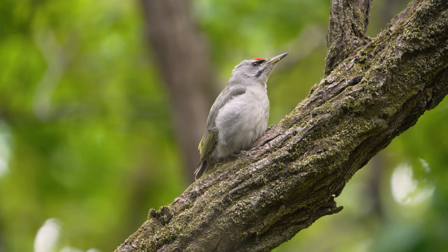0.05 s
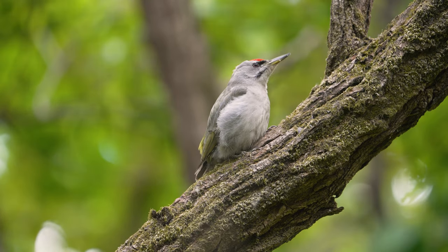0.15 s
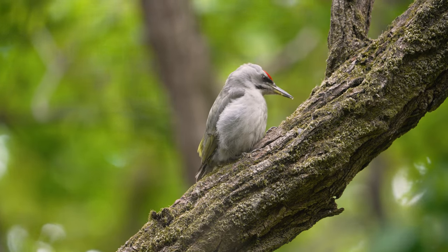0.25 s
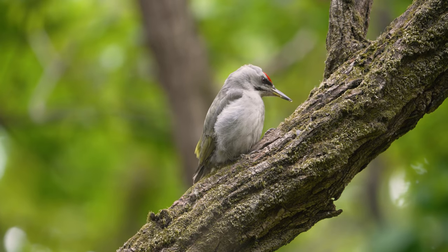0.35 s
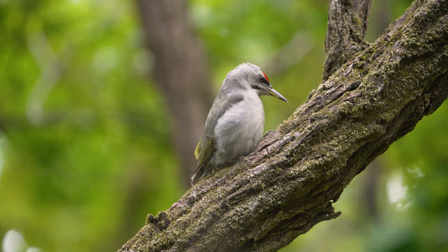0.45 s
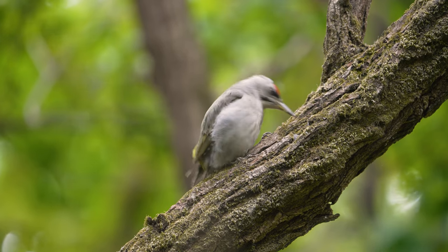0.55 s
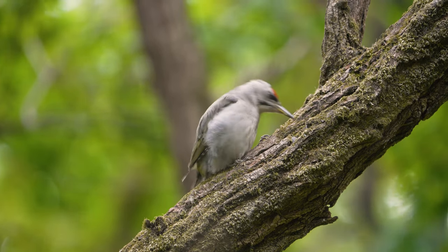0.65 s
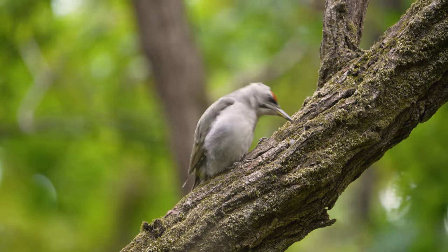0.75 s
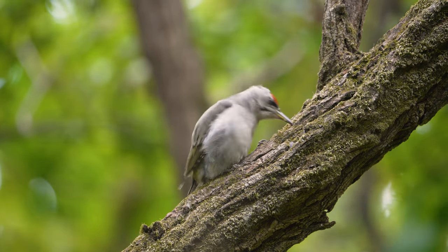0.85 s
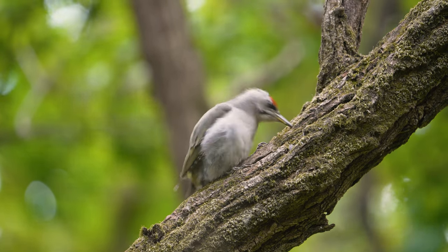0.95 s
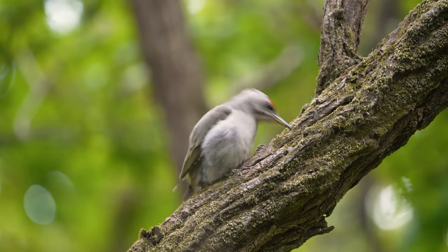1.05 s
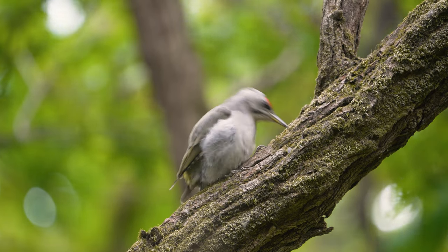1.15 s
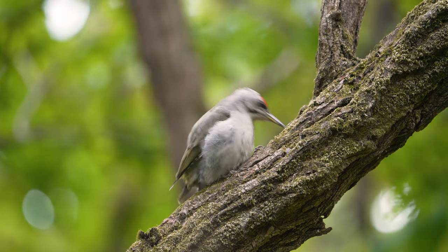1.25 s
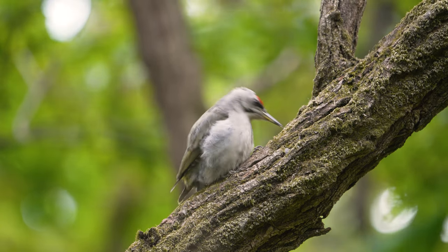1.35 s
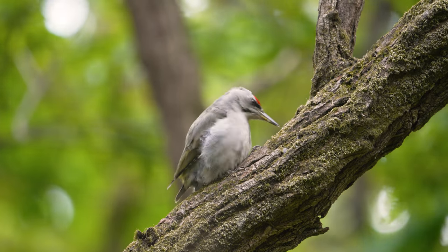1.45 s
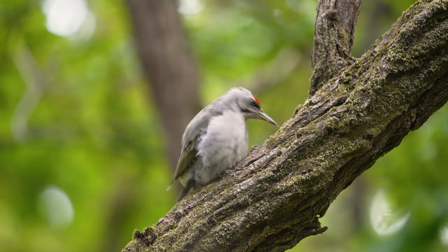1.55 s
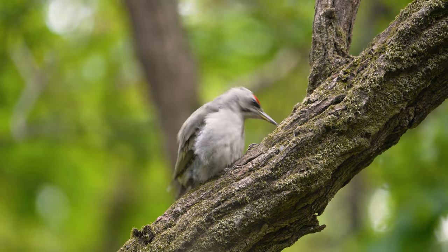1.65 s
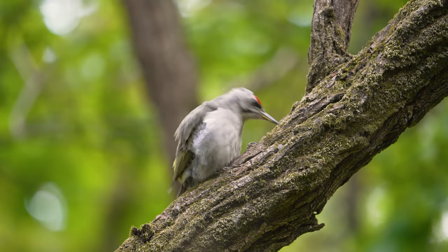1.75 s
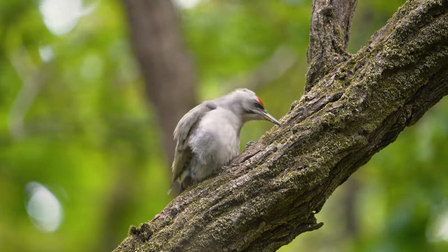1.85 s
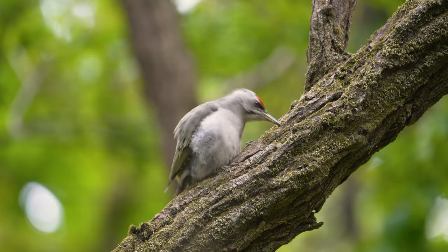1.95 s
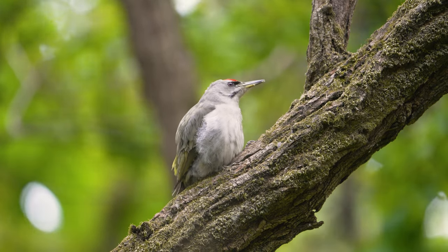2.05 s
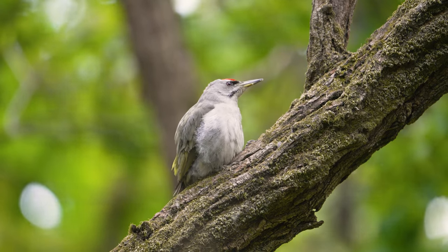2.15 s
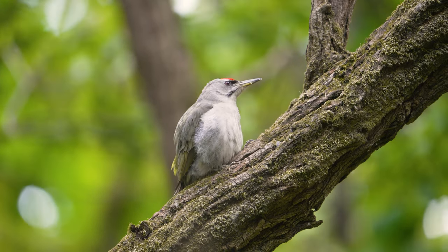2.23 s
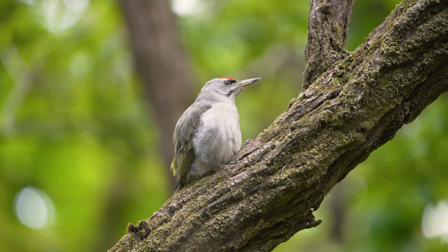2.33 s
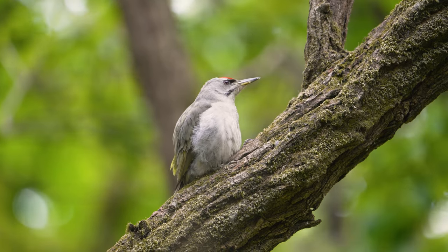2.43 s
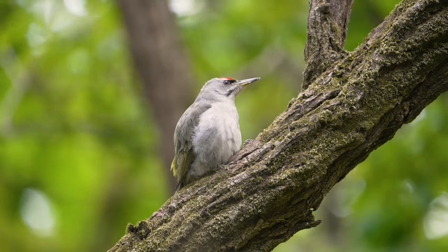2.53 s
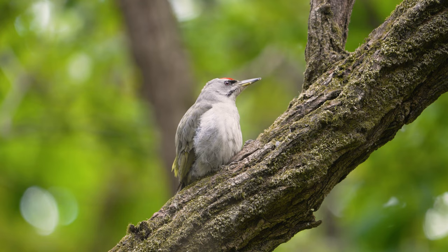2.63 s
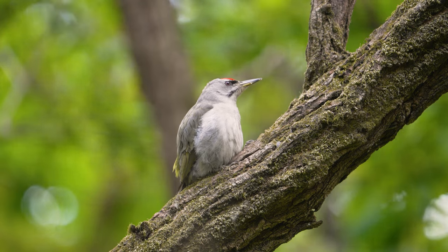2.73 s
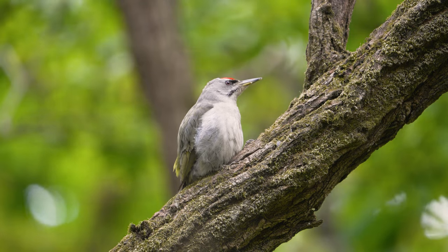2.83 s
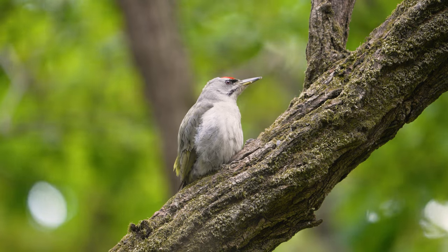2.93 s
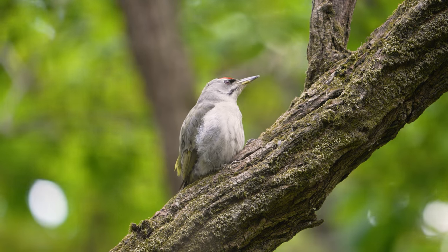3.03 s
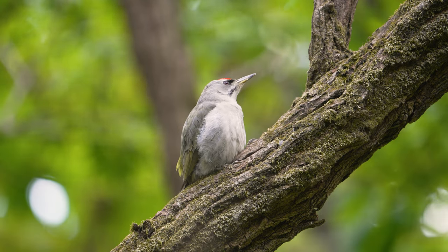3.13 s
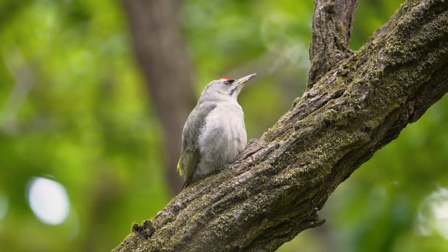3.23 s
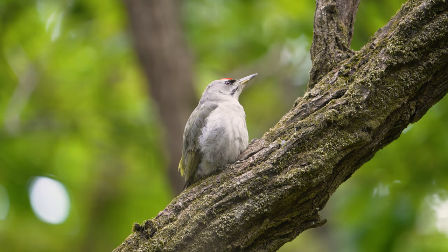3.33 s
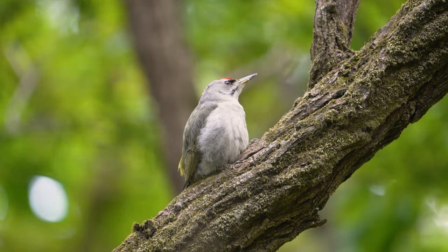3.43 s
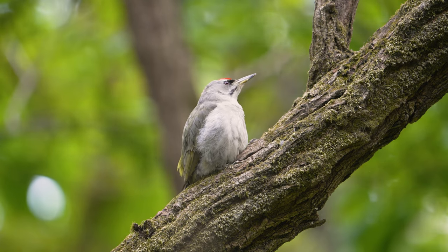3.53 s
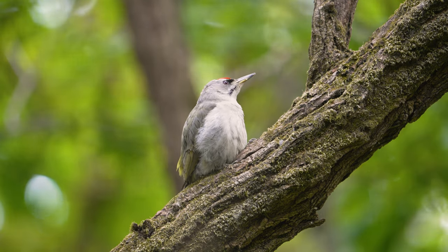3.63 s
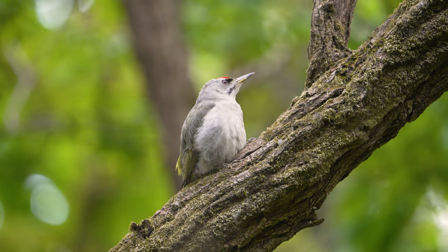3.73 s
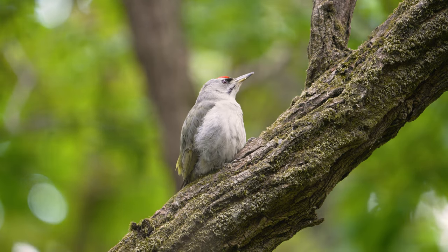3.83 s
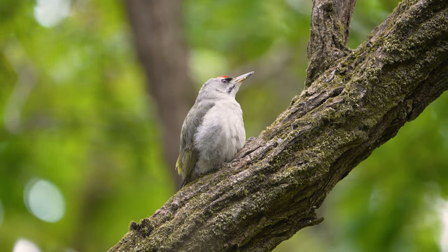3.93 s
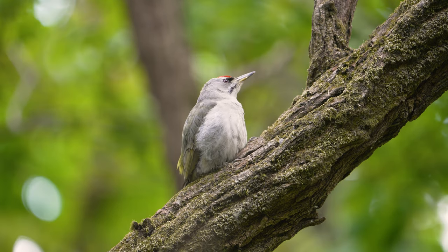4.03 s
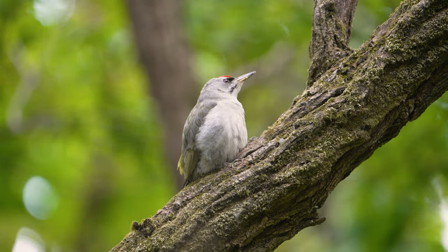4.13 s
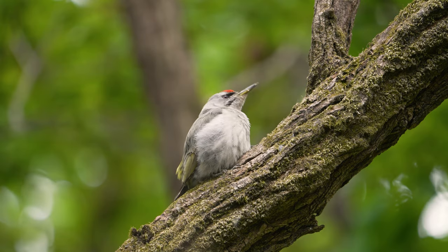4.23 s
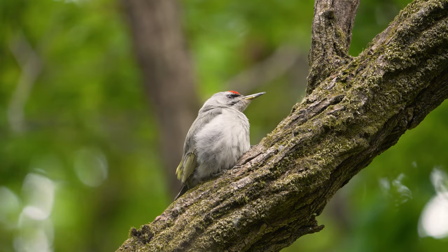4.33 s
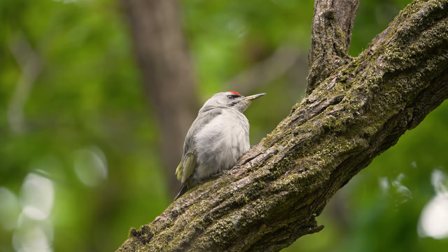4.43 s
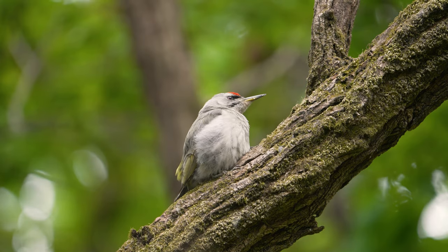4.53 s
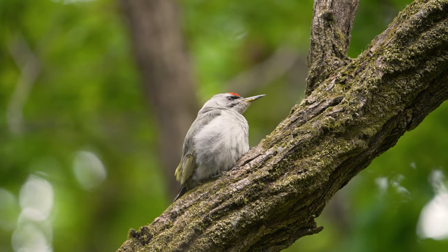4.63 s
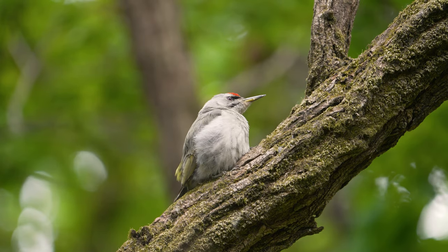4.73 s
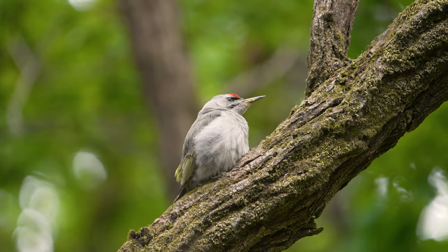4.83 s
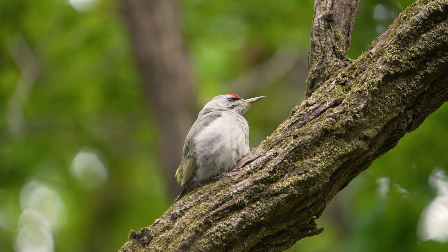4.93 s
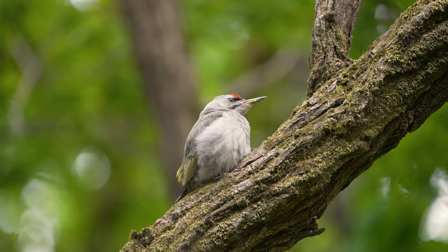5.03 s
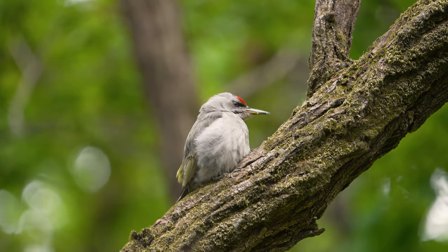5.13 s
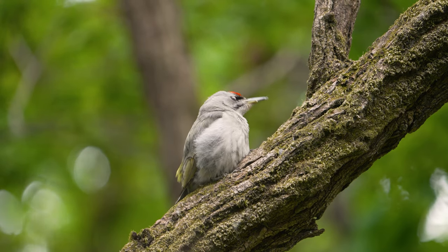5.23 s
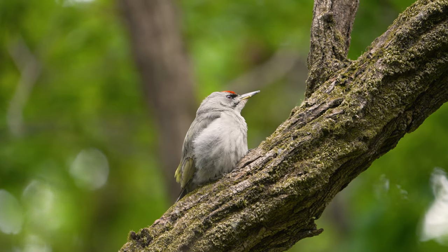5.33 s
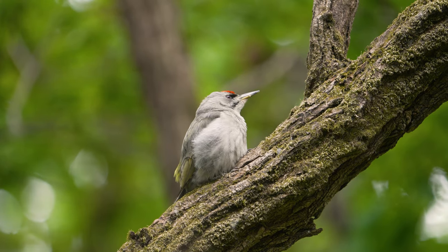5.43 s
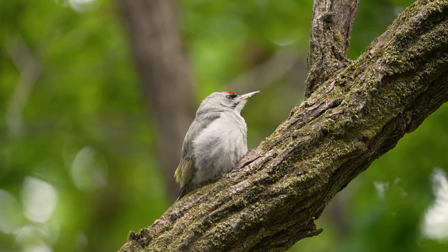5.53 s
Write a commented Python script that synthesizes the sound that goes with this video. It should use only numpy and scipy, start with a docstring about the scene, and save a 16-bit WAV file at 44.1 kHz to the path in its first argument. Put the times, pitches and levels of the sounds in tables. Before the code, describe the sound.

In a quiet leafy forest, a nearby woodpecker soon fires off a rapid roll of even, hollow, woody knocks with a mid-pitched ring, slowing very slightly and ending on a weaker blow. A dull faint echo returns from the trees. Afterwards only hushed leaves, soft low air rumble and distant chirping songbirds remain; later the background drops suddenly and a thin cry sounds. The drummer is close and nearly dry.

```python
"""First comes the hush of a forest with rumbling air and far small birds: shaped noise and gliding tones.
Then a woodpecker drums 29 blows on a hollow branch, slowing slightly, the last blow weak.
Each blow sets the wood ringing near 850 Hz, with a short crack of noise from the bill.
The trunks around scatter the sound and throw back a dull echo. Later the background level steps down at
once and the songbirds break off briefly, while a thin cry sounds; near the end a distant rushing rises."""
import sys
import numpy as np
from scipy import signal
from scipy.fft import rfft, irfft
from scipy.io import wavfile

SR = 44100
rng = np.random.default_rng(int(sys.argv[2]) if len(sys.argv) > 2 else 0)


def int16_out(signal):
    """Quantize to a 16-bit WAV file."""
    q = np.round(np.clip(np.atleast_2d(signal).T, -1, 1) * 32767)
    wavfile.write(sys.argv[1], SR, q.astype(np.int16))


N = 246078
TIME = np.arange(N) / SR   # seconds

# In the colour tables only the shape counts: each noise is later scaled to its own layer level.
# colour of the air rumbling on the microphone: pitch_hz, level_db (per Hz)
RUMBLE_COLOUR = [(12, -30.5), (20, 3), (45, -1), (64, 2.5), (100, -8), (161, -19), (205, -12), (290, -46.5),
                 (480, -120)]
# colour of the low part of the forest hush: pitch_hz, level_db (per Hz)
LOW_HUSH_COLOUR = [(60, -11), (110, -4), (190, -2.5), (250, -3), (340, -1.1), (550, -7), (900, -10),
                   (1800, -41)]
# colour of the main forest hush: pitch_hz, level_db (per Hz)
HUSH_COLOUR = [(300, -22.5), (600, -1.5), (1100, -7), (2000, -1.5), (3000, -7), (4000, -5.5), (5000, -13),
               (6500, -21)]
# colour of the hissing leaves: pitch_hz, level_db (per Hz)
LEAVES_COLOUR = [(1500, -19), (3500, 9), (5000, -0.5), (6000, -4), (7500, -3), (9000, -11.5),
                 (10300, -11.5), (12000, -21.5), (16000, -26)]
# colour of the distant rushing, with a faint hollow tone: pitch_hz, level_db (per Hz)
RUSH_COLOUR = [(400, -15.5), (580, -0.5), (930, -3), (1010, 1), (1060, 5), (1120, -0.5), (1600, -3),
               (2200, -9), (4000, -10.5)]
# loudness of the rushing over time: time_s, level_db
RUSH_LOUDNESS = [(4.76, -54), (4.81, -45.5), (5.0, -48), (5.25, -47.5), (5.42, -51), (5.58, -49)]
# level of each background layer: start_level_db, easing_db_per_s, step_down_db
RUMBLE_LEVEL = (-43.5, 2.3, 3.6)
LOW_HUSH_LEVEL = (-49, 0.055, 1)
HUSH_LEVEL = (-46.5, 0.6, 5.4)
LEAVES_LEVEL = (-53.5, 0.76, 4.4)
# breaths of wind that lift the hiss of the leaves: peak_s, length_s, rise_db
GUSTS = [(0.3, 0.38, 2.5), (3.0, 0.5, 3)]
# soft buffets of air on the microphone: peak_s, length_s, level_db
BUFFETS = [(0.354, 0.028, -42.5), (1.519, 0.048, -38.5), (1.756, 0.094, -44.5), (1.868, 0.036, -43)]

# phrases of short chips, each repeating one glide and loudest in its middle, before the distance is added:
# start_s, chip_count, gap_s (from start to start), chip_length_s,
# start_pitch_hz, middle_pitch_hz, end_pitch_hz (each chip is slightly retuned),
# trill_depth_hz, level_db, swell_db (how much softer the outer chips are)
CHIPS = [(0.187, 1, 0.08, 0.071, 3440, 3860, 3960, 60, -40.5, 0),
         (0.385, 2, 0.078, 0.028, 3710, 4040, 3800, 200, -40.5, 0.5),
         (1.395, 1, 0.093, 0.085, 3480, 4070, 3440, 40, -37.5, 0),
         (2.471, 3, 0.083, 0.024, 4310, 3800, 3400, 260, -39, 1),
         (2.742, 5, 0.085, 0.038, 3553, 4214, 4890, 450, -44.5, 0),
         (3.197, 3, 0.11, 0.05, 3640, 4560, 4330, 380, -37, 5),
         (3.954, 4, 0.081, 0.036, 4090, 4134, 3530, 140, -38.5, 1),
         (5.264, 4, 0.087, 0.03, 10000, 9400, 8900, 30, -64.5, 1)]
# clear drawn-out whistles, before the distance is added:
# start_s, length_s, start_pitch_hz, end_pitch_hz, level_db
WHISTLES = [(2.24, 0.063, 4620, 4980, -53), (2.31, 0.4, 3830, 3400, -53), (2.492, 0.059, 4720, 4980, -51),
            (2.712, 0.35, 3320, 3440, -50), (3.24, 0.16, 2800, 2954, -50.5), (3.957, 0.39, 4330, 4206, -51),
            (4.748, 0.057, 4670, 5070, -56), (4.957, 0.099, 4600, 5080, -57),
            (5.173, 0.115, 4790, 4890, -58), (5.425, 0.062, 4750, 4920, -55), (5.5, 0.106, 5030, 5200, -55)]
# a thin drawn-out bird cry, before the distance is added: time_s, pitch_hz, level_db
CRY = [(4.24, 1910, -62), (4.26, 1900, -52.5), (4.35, 1850, -55), (4.44, 1950, -58.5), (4.53, 1878, -49.5),
       (4.55, 1770, -53), (4.59, 1286, -64)]
# its overtones: multiple (of the pitch), level_db (added to the cry)
CRY_TONES = [(2, 8), (3, -4), (4, -9), (5, -22), (6, -22)]

# fading of the scatter among the trunks: time_s (before stretching), level_db (relative)
SCATTER_FADE = [(0, -12), (.008, 5), (.03, -2.5), (.07, -2.5), (.18, -25.5), (.3, -31), (.6, -33),
                (1.2, -68.5)]
# colour of that scatter: pitch_hz, level_db
SCATTER_COLOUR = [(400, -1.5), (850, 2), (1200, 9), (1750, 8.5), (2500, 3), (4000, -4.5), (9000, -1)]

# ways the branch rings, the main one first:
# pitch_hz, level_db (added to the blow), t60_s (time to fade by 60 dB), polarity (+1 or -1)
BRANCH = [(862.3, -6.5, 0.065, -1), (656, -33, 0.066, 1), (817.5, -0.84, 0.02, 1), (927, -3, 0.0096, -1),
          (1170, -26, 0.019, -1), (1626, -8.5, 0.01, -1), (1733, -1, 0.0065, 1), (1922, -14.5, 0.01, -1),
          (2598, -20.5, 0.013, -1), (3215, -34.5, 0.016, 1), (3775, -36.5, 0.02, -1), (4530, -44, 0.035, 1),
          (5170, -42, 0.021, -1), (6860, -52.5, 0.033, 1)]
# effort of the neck, fading on the last blows: time_s, level_db
EFFORT = [(0.59, 2), (0.65, -0.5), (0.77, 2), (0.85, 0.9), (1.25, 0.64), (1.52, 1.2), (1.73, 0),
          (1.93, 1.5), (2.0, -0.5), (2.055, -4)]

# at STEP_S the background level steps down and the songbirds break off, even in mid-note;
# they are silent for SONG_GAP_S
STEP_S, SONG_GAP_S = 4.263, 0.38
LEAVES_FADE_DB_PER_S = 11   # from the end of the song gap, the hiss of the leaves fades
TRILL_PER_S = 180   # the pitch shakes this fast within a chip
CRY_WAVER = 0.008   # rms pitch shake, as a share of the pitch
# the bill bounces at a nearly even pace, and slows as the bird tires
ROLL_START_S, BLOW_COUNT = 0.5913, 29
BLOW_GAP_S, FIRST_GAP_S, SLOWING_S = 0.05165, 0.0492, 0.0039
CUTOFF_HZ = 16000


def from_db(db):
    """Turn decibels into a plain multiplier."""
    return 10 ** (np.asarray(db) / 20)


def rms_one(x):
    """Scale a sound to an average strength (rms) of 1."""
    return x / np.sqrt(np.mean(x ** 2) + 1e-20)


def in_time(rows):
    """Draw straight lines between the rows of a table, giving each column a value at every sample."""
    seconds, *columns = np.transpose(rows)
    return [np.interp(TIME, seconds, column) for column in columns]


def coloured(x, points):
    """Shape the spectrum by (Hz, dB) points, falling 20 dB per octave beyond them."""
    hz, level_db = np.transpose(points)
    octave = np.log2(np.arange(len(x) // 2 + 1) * SR / len(x) + 1)
    known = np.log2(hz)
    outside = np.abs(octave - np.clip(octave, known[0], known[-1]))
    gain = from_db(np.interp(octave, known, level_db) - 20 * outside)
    return irfft(rfft(x) * gain, len(x))


def noise(points):
    """Random noise with the given colour and an rms of 1."""
    return rms_one(coloured(rng.standard_normal(N), points))


def low_pass(x, cut_hz):
    """Dull a sound by softening everything above the cut."""
    return signal.sosfilt(signal.butter(2, cut_hz, fs=SR, output="sos"), x)


def easing(start_db, db_per_s, step_down_db):
    """Level of a background layer: it sinks slowly, and steps down at STEP_S."""
    return start_db - db_per_s * TIME - step_down_db * (TIME > STEP_S)


def bumps(rows):
    """Add up smooth bell-shaped swells, each given by its peak time, length and height."""
    return sum(height * np.exp(-((TIME - peak) / length) ** 2) for peak, length, height in rows)


def rumble():
    """Light air pressing on the microphone makes deep noise."""
    return from_db(easing(*RUMBLE_LEVEL)) * noise(RUMBLE_COLOUR)


def hush():
    """The forest hush is a low and a higher band of soft noise, each easing by itself."""
    low = from_db(easing(*LOW_HUSH_LEVEL)) * noise(LOW_HUSH_COLOUR)
    return low + from_db(easing(*HUSH_LEVEL)) * noise(HUSH_COLOUR)


def leaves():
    """Leaves hiss as bright noise, lifted by gusts and fading near the end."""
    fading = LEAVES_FADE_DB_PER_S * np.maximum(TIME - STEP_S - SONG_GAP_S, 0)
    level_db = easing(*LEAVES_LEVEL) + bumps(GUSTS) - fading
    return from_db(level_db) * noise(LEAVES_COLOUR)


def rush():
    """The distant rushing is noise with a faint hollow tone, rising near the end."""
    level_db, = in_time(RUSH_LOUDNESS)
    return from_db(level_db) * noise(RUSH_COLOUR)


def buffets():
    """Soft buffets of air on the microphone are brief swells of low noise."""
    swell = bumps([(peak, length, from_db(level_db)) for peak, length, level_db in BUFFETS])
    return swell * noise([(40, -4.5), (70, -1.0), (150, -8), (250, -19)])


def forest(x, stretch=0.86):
    """Countless small reflections from trunks and leaves; a farther source is spread over a longer time."""
    seconds, level_db = np.transpose(SCATTER_FADE)
    age = TIME[:SR] / stretch
    reflections = rng.standard_normal(SR) * from_db(np.interp(age, seconds, level_db))
    # even out the total energy before colouring
    reflections = coloured(reflections / np.linalg.norm(reflections), SCATTER_COLOUR)
    return signal.fftconvolve(x, reflections)[:N]


def echo(x, delay_s, level_db, cut_hz):
    """One late, dull reflection from a stand of trees."""
    return from_db(level_db) * np.interp(TIME - delay_s, TIME, low_pass(x, cut_hz), left=0)


def add_note(song, start, length, pitches, level_db, wobble):
    """Add one bird note that glides through its pitches, swelling and fading."""
    span = (TIME >= start) & (TIME < start + length)
    progress = (TIME[span] - start) / length
    # a line through two pitches, or a smooth curve through three
    curve = np.polyfit(np.linspace(0, 1, len(pitches)), pitches, len(pitches) - 1)
    glide = np.polyval(curve, progress)
    phase = 2 * np.pi * np.cumsum(glide * (1 + wobble[span])) / SR
    swell = np.sqrt(np.abs(np.sin(np.pi * progress)))
    song[span] += from_db(level_db) * swell * np.sin(phase)


def songbirds(waver=0.014, buzz=0.014, pitch_spread=0.01):
    """Trilled chips repeat in phrases that swell and ebb; whistles glide straight, with a slight waver."""
    song = np.zeros(N)
    flutter = noise([(20, 5.5), (250, 5.0), (600, -28.0)])
    trill = np.sin(2 * np.pi * TRILL_PER_S * TIME)
    for start, count, gap, length, *pitches, trill_hz, level_db, swell_db in CHIPS:
        count = round(count)
        wobble = buzz * flutter + trill * trill_hz / np.mean(pitches)
        for k in range(count):
            # from -1 at the first chip to 1 at the last
            off_centre = (2 * k - (count - 1)) / max(count - 1, 1)
            chip_db = level_db - swell_db * off_centre ** 2
            tuning = 1 + pitch_spread * rng.standard_normal()
            add_note(song, start + k * gap, length, tuning * np.array(pitches), chip_db, wobble)
    for start, length, *pitches, level_db in WHISTLES:
        add_note(song, start, length, pitches, level_db, waver * flutter)
    return song


def cry():
    """A slightly hoarse stack of overtones that drops at its end."""
    pitch, level_db = in_time(CRY)
    shake = 1 + CRY_WAVER * noise([(20, -1), (150, -7), (400, -29)])
    phase = 2 * np.pi * np.cumsum(pitch * shake) / SR
    sounding = (TIME > CRY[0][0]) & (TIME < CRY[-1][0])
    tones = sum(from_db(tone_db) * np.sin(round(multiple) * phase) for multiple, tone_db in CRY_TONES)
    return sounding * from_db(level_db) * tones


def far_birds(song_direct_db=-2.0, song_scatter_db=0, cry_direct_db=-7.5, cry_scatter_db=-3):
    """Trees blur the far birds by scattering their sound; only the cry sounds in the song gap."""
    song, call = songbirds(), cry()
    # silences the songs and their scatter alike
    song_on = (TIME < STEP_S) | (TIME > STEP_S + SONG_GAP_S)
    far_song = from_db(song_direct_db) * song + from_db(song_scatter_db) * forest(song, stretch=1.1)
    far_cry = from_db(cry_direct_db) * call + from_db(cry_scatter_db) * forest(call, stretch=1.8)
    return song_on * far_song + far_cry


def blows(uneven_db=0.33, hardness_db=-0.9, hardness_spread_db=1.24):
    """Time (s), strength (dB) and hardness (dB) of each blow; the gaps widen towards the end."""
    progress = np.arange(BLOW_COUNT - 1) / (BLOW_COUNT - 1)
    gaps = BLOW_GAP_S + SLOWING_S * progress ** 4
    gaps[0] = FIRST_GAP_S
    times = ROLL_START_S + np.r_[0, np.cumsum(gaps)]
    force, aim = rng.standard_normal((BLOW_COUNT, 2)).T
    strength = np.interp(times, *np.transpose(EFFORT)) + uneven_db * force
    hardness = hardness_db + hardness_spread_db * aim
    return times, strength, hardness


def clicks_at(times, level_db):
    """Place one single-sample click per blow."""
    clicks = np.zeros(N)
    clicks[np.round(times * SR).astype(int)] = from_db(level_db)
    return clicks


def fade_per_sample(t60):
    """Multiplier per sample that fades a sound by 60 dB in t60 seconds."""
    return from_db(-60 / (t60 * SR))


def ring(clicks, hz, t60):
    """Each click starts a fading sine, of height 1 for a click of 1."""
    fade, turn = fade_per_sample(t60), 2 * np.pi * hz / SR
    # the tiny offset keeps the filter away from extremely small numbers
    return signal.lfilter([0, np.sin(turn)], [1, -2 * fade * np.cos(turn), fade * fade], clicks + 1e-18)


def bill_crack(times, strength, hardness, level_db=-27, t60=.016, low_hz=1900, high_hz=3600, top_hz=5000):
    """The bill tip crushes the surface fibres: a few milliseconds of bright noise."""
    clicks = clicks_at(times, strength + hardness + level_db)
    burst = signal.lfilter([1], [1, -fade_per_sample(t60)], clicks + 1e-18)
    band = signal.butter(1, [low_hz, high_hz], "band", fs=SR, output="sos")
    top = signal.butter(1, top_hz, fs=SR, output="sos")
    return signal.sosfilt(np.vstack([band, top]), burst * rng.standard_normal(N))


def drumming(times, strength, hardness, hard_above_hz=1400, loose_above_hz=3000, spread_db=1.5, contact_hz=7000):
    """Blows ring every mode; hard ones favour upper modes, and the highest vary with the spot struck."""
    wood = np.zeros(N)
    for hz, level_db, t60, polarity in BRANCH:
        spot = spread_db * rng.standard_normal(len(times)) * (hz > loose_above_hz)
        blow_db = strength + level_db + hardness * (hz > hard_above_hz) + spot
        wood += np.sign(polarity) * ring(clicks_at(times, blow_db), hz, t60)
    # the contact lasts a moment, which rounds off the very top
    return low_pass(wood, contact_hz)


def scene(scatter_db=-18):
    """The drummer is near and nearly dry; the other birds are far off."""
    background = rumble() + hush() + leaves() + rush() + buffets()
    strikes = blows()
    roll = drumming(*strikes) + bill_crack(*strikes)
    # the far echo is itself smeared by the trees it passes
    smeared = roll + from_db(-3.5) * forest(roll, stretch=1.8)
    scatter = from_db(scatter_db) * forest(roll)
    far_echo = echo(smeared, delay_s=0.18, level_db=-25.5, cut_hz=940)
    return (background + far_birds() + roll + scatter + far_echo)[None]


def record(dry, hiss_db=-72):
    """The microphone adds a faint even hiss, and the top is cut steeply."""
    heard = dry + from_db(hiss_db) * rng.standard_normal(N)
    return signal.sosfilt(signal.ellip(10, .1, 80, CUTOFF_HZ, fs=SR, output="sos"), heard)


dry = scene()
out = record(dry)
int16_out(out)
```